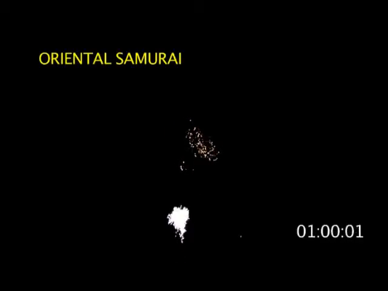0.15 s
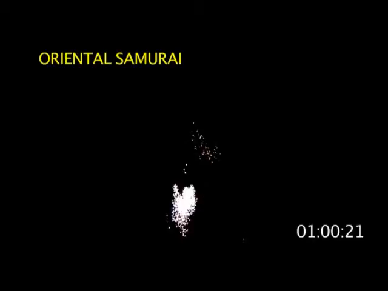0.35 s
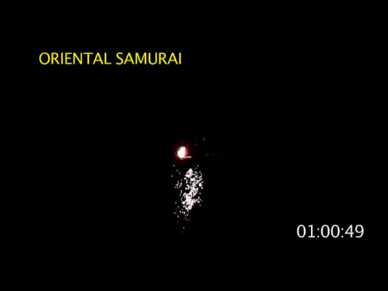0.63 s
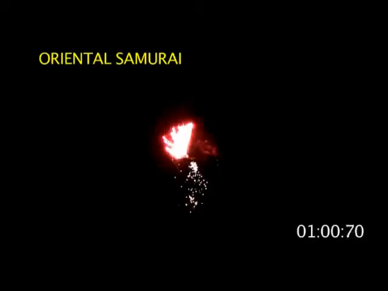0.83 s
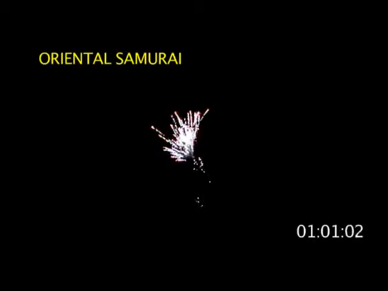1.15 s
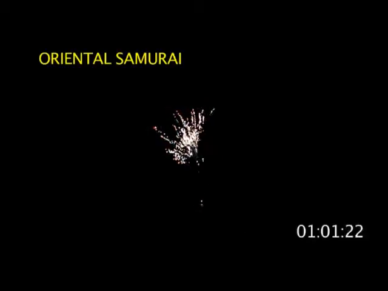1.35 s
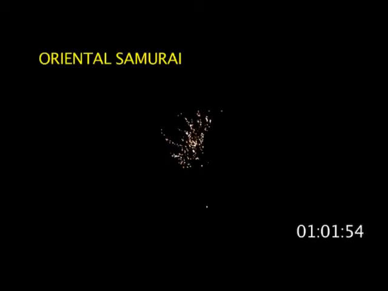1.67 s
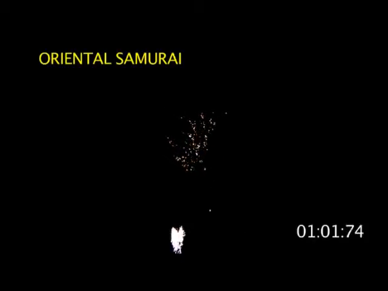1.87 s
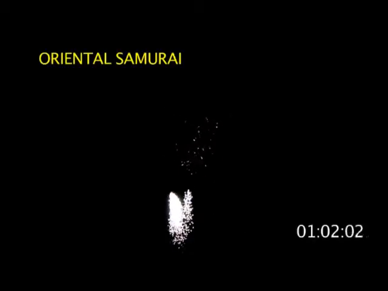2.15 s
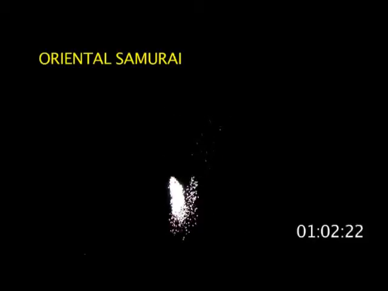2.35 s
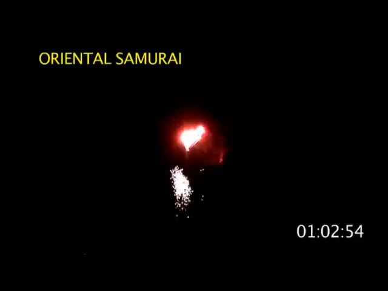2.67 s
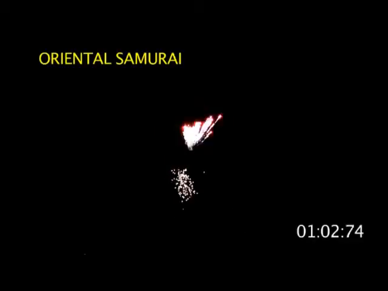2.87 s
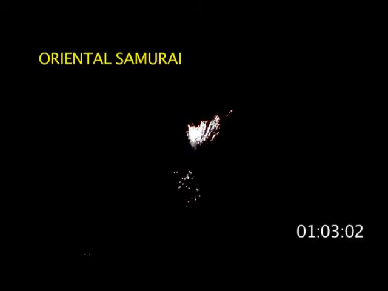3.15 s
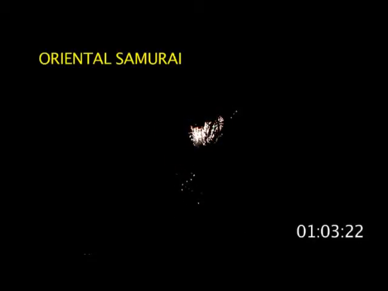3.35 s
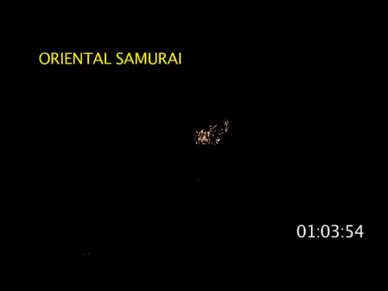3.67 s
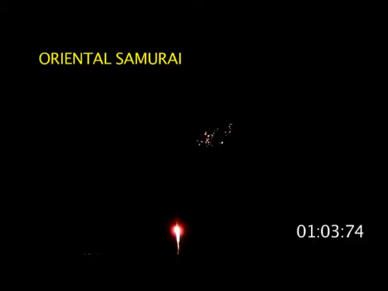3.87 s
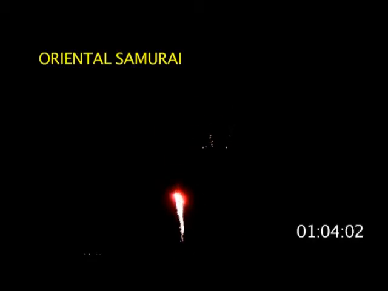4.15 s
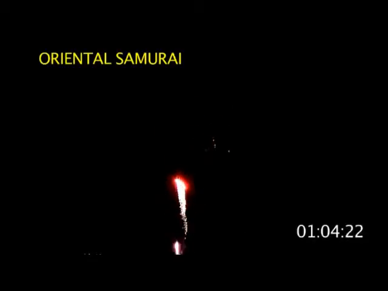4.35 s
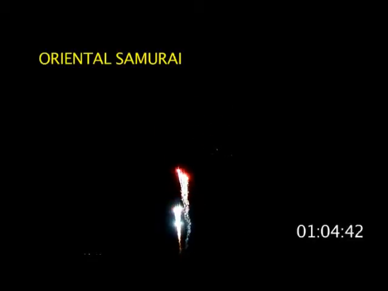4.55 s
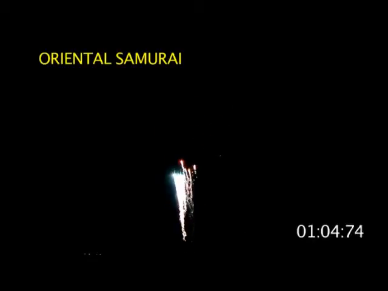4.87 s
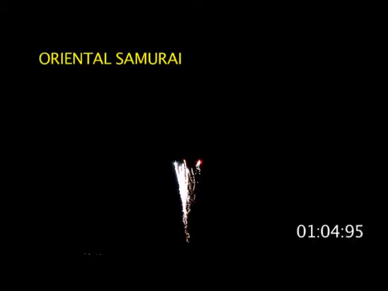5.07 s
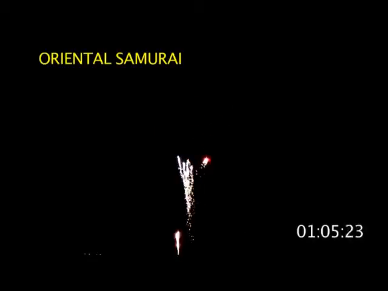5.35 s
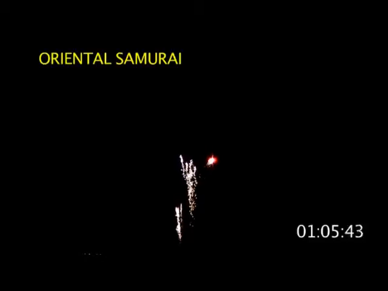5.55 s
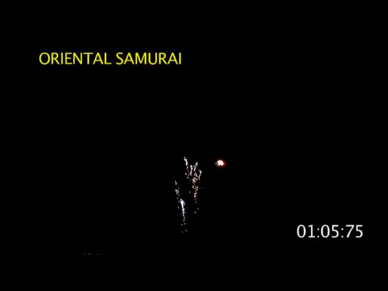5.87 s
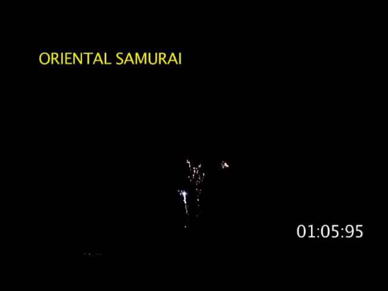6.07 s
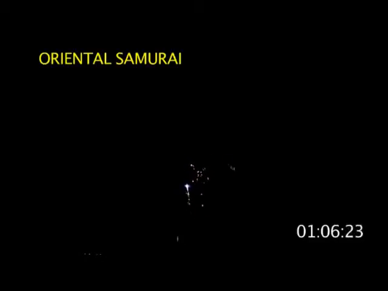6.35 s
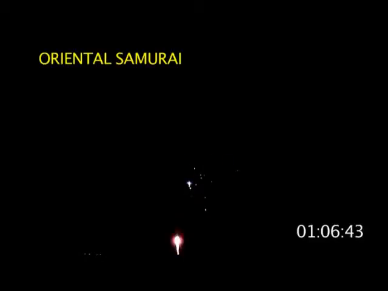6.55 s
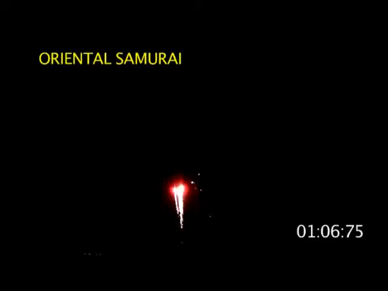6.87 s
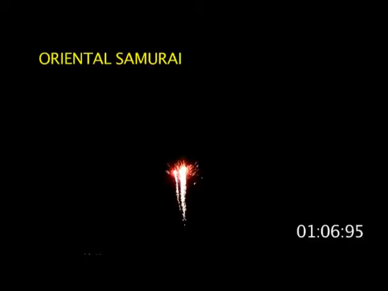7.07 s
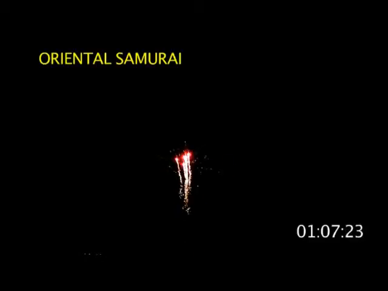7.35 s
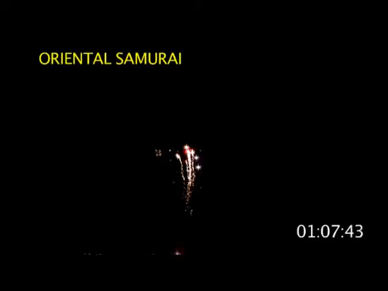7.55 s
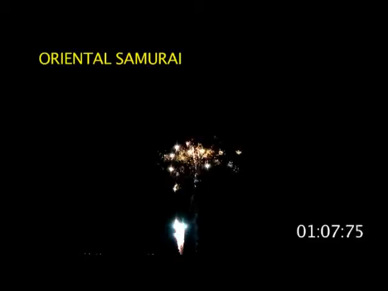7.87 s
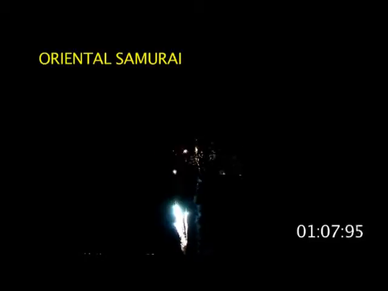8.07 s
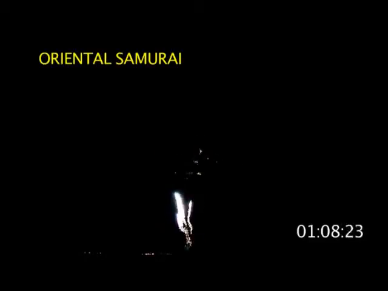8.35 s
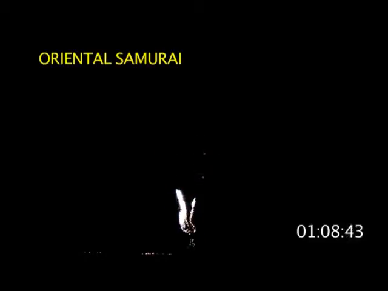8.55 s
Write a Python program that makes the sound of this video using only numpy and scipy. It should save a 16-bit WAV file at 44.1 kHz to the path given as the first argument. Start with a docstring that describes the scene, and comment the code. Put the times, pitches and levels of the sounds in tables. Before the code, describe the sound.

Outdoors over faint night air, fireworks leave their tubes with dull thumps and a light hiss of sparks. Two shells burst early with loud cracks that overload the microphone and roll back as echoes. After a quieter stretch of soft launch thuds, a third bang rings out, followed by a rapid patter of crackling pops that thins out at the end.

```python
"""Outdoors on a quiet night, a box of fireworks fires its shots some way off.
Small powder charges thump in their tubes and send up hissing, burning tails. Three shells crack
overhead and their echoes roll back from the surroundings. The last shell scatters a cloud of
crackling stars (little burning pellets). The loudest cracks overload the microphone."""
import sys
import numpy as np
from scipy import signal
from scipy.fft import rfft, irfft
from scipy.io import wavfile
from scipy.ndimage import uniform_filter1d

SR = 44100
rng = np.random.default_rng(int(sys.argv[2]) if len(sys.argv) > 2 else 0)


def generate_wav(signal):
    """Clip the signal to [-1, 1] and save it as 16-bit WAV at the path in sys.argv[1]."""
    frames = np.transpose(np.atleast_2d(signal))
    scaled = np.clip(frames, -1, 1) * 32767
    pcm = np.round(scaled).astype(np.int16)
    wavfile.write(sys.argv[1], SR, pcm)


N = 384111
TIME = np.arange(N) / SR

# The tone of the night air. Each row: frequency in Hz, level in dB.
AIR_SPECTRUM = [(12, -43), (20, -20), (60, -3.5), (81, -6), (216, -16.5), (410, -23), (738, -21.5),
                (802, -20), (976, -21), (1060, -17.5), (1610, -25.5), (1760, -28.5), (2390, -33.5),
                (13900, -51.5), (16000, -57.5)]
# How wide all-around sound is. Each row: frequency in Hz, stereo side level over the middle in dB.
STEREO_WIDTH = [(60, -14.5), (99, -17.5), (160, -14), (270, -13.5), (450, 2), (740, -0.5), (1220, -2),
                (2010, -5.5), (3330, -12.5), (5500, 5.5), (9080, 2.5), (15000, -4)]
# Small dull pops, soft thuds, fizzes and a brief ring in the first shell's echo. Each row: time in seconds,
# level in dB, pitch in Hz, # width in octaves, spread in seconds.
SMALL_PUFFS = [(0.484, -17.5, 1225, 0.073, 0.0021), (.863, -34.5, 1204, 0.15, 0.001),
               (0.8907, -33, 1200, 0.12, 0.0016), (1.153, -35.5, 1070, 0.029, 0.029),
               (2.224, -67, 9800, .3, .018), (3.911, -49.5, 115, 0.41, 0.024),
               (5.273, -65.5, 1780, 0.19, 0.0094), (5.895, -62, 10000, .4, .001),
               (6.32, -69, 9500, .3, .001), (6.469, -59, 1900, 0.42, 0.01), (7.772, -52, 2300, 0.25, 0.011)]
# The charges that lift the shots. Each row: start in seconds, thump level in dB, bass tilt in dB per
# octave, gas spit level in dB, its decay in seconds, its pitch in Hz, tail hiss level in dB,
# the time the hiss takes to swell in seconds.
LIFT_CHARGES = [(0.2236, -5.5, 0, -23, 0.004, 2920, -51.5, 0.27),
                (2.0645, -4, 0.5, -23.5, 0.0031, 3200, -55.5, .13),
                (4.026, -30, 0.5, -46, 0.0045, 3120, -68.5, 0.026),
                (4.6269, -23.5, -1, -43.5, 0.004, 2870, -66.5, 0.05),
                (5.5492, -27.5, 1, -34.5, 0.003, 2465, -65, 0.039),
                (6.5428, -16, 2, -35, 0.0044, 2560, -67.5, 0.052),
                (6.808, -22, 0.5, -32.5, 0.0025, 3360, -70.5, 0.039),
                (7.848, -30.5, -0.5, -47.5, 0.0039, 3000, -67, 0.046)]
# Shells bursting overhead. Each row: start in seconds, level in dB, ground bounce delay in seconds,
# bounce level in dB, echo level in dB, extra bite in the upper middle tones in dB.
SHELL_BURSTS = [(.9614, 10.5, .00272, -11.5, -11, -2), (2.8358, 11.5, 0.003, -7, -13.5, 1),
                (7.2984, 8.5, 0.00248, -6.5, -10.5, 3.5)]
# Stars that pop alone or stand out of the cloud. Each row: start in seconds, level in dB.
STANDOUT_STARS = [(.4518, -8), (.4797, -7.5), (7.8103, -33.5), (7.8578, -12.5), (7.9034, -18.5),
                  (7.930, -12.5), (7.962, -10.5), (8.002, -9.5), (8.027, -5), (8.039, -5.5), (8.113, -2.5),
                  (8.200, -4.5), (8.217, -2), (8.269, -11), (8.324, -14), (8.352, -25.5), (8.388, -10),
                  (8.4411, -7), (8.4449, -20), (8.462, -5.5), (8.473, -19.5), (8.5352, -14),
                  (8.5769, -14.5), (8.6248, -15.5)]
# The tones of a lift charge, escaping gas, a burning tail, a star and a shell.
# Each row: frequency in Hz, level in dB.
THUMP_SPECTRUM = [(20, -46), (35, -25.5), (55, -8.5), (85, -4), (130, 0), (180, -3.5), (205, -16.5),
                  (235, -2.5), (280, -7), (328, -3.5), (380, -27), (700, -36), (1500, -44), (5000, -71.5)]
GAS_SPECTRUM = [(200, -10), (700, -13), (1400, -10), (2200, -3.5), (3050, -2.5), (4300, -10.5), (4950, -10),
                (6300, -21.5), (7600, -32.5), (10000, -26.5), (16000, -48)]
SPARK_SPECTRUM = [(500, -16.5), (1400, -4), (2300, 1.5), (3100, 1.5), (4200, -7.5), (5000, -9), (6200, -21),
                  (7600, -28), (9800, -24.5), (13500, -23), (16000, -35.5)]
STAR_SPECTRUM = [(40, -34.5), (320, -6), (500, -11.5), (800, -9), (1200, -5), (1450, -8), (2200, -1.5),
                 (3000, 0), (4300, -12), (5000, -15.5), (7400, -35), (9800, -31.5), (14000, -44),
                 (17000, -63)]
SHELL_SPECTRUM = [(20, -40), (55, -7.5), (110, 1.5), (300, 7.5), (700, 5.5), (1150, 2), (1450, -1),
                  (2200, 2), (3000, 1), (4100, -11.5), (5000, -14.5), (7500, -31), (9800, -23),
                  (14000, -27.5), (17000, -51)]
# Groups of surfaces that echo a sound made in the sky, or on the ground.
# Each row: delay in seconds, boost over the even echo in dB, spread in seconds.
SKY_REFLECTORS = [(.03, 5.5, .025), (.135, 11, .022), (.21, 15, 0.035), (.33, 10.5, .025), (.39, 8, 0.016),
                  (.485, 6, .016), (.72, 3.5, .025)]
GROUND_REFLECTORS = [(.016, 6, .015), (.113, 5, 0.013), (.25, 4, .04)]
# Large surfaces that slap sound back. Each row: delay in seconds, strength in dB.
WALL_SLAPS = [(.07, 20), (0.116, 27.5), (0.207, 22), (.25, 4), (.355, 34.5), (0.407, 38.5)]
# The tone of the echoes. Each row: frequency in Hz, boost in dB.
ECHO_TONE = [(40, 6.5), (150, 5), (330, -5), (600, -4.5), (1100, 2), (2500, -3), (5000, 2.5), (8000, 8.5),
             (14000, 10.5)]
# What the air soaks up. Each row: frequency in Hz, loss in dB per second of travel.
AIR_LOSS = [(100, 4), (1100, 3.3), (2200, 8.9), (3500, 13), (5000, 15), (8000, 90), (14000, 100)]
# Tones the microphone's housing lifts or dips. Each row: frequency in Hz, width in Hz, boost in dB.
HOUSING_RESONANCES = [(1800, 110, 2.5), (2200, 100, 4), (2650, 570, -0.5), (2960, 160, 0), (3930, 120, 3.5),
                      (4480, 500, -4), (4850, 110, 6.5), (9140, 2900, 0.5), (12500, 870, 3)]

SKY_FADE_DB_PER_S, GROUND_FADE_DB_PER_S = 12.5, 29  # echo fade, on top of the loss in the air


def gain_of(db):
    """Turns decibels into a number to multiply by."""
    return 10 ** (np.asarray(db) / 20)


def unit_level(x):
    """Scales a signal to an average (rms) level of 1."""
    return x / np.sqrt(np.mean(x ** 2) + 1e-20)


def bell(t, centre_s, spread_s):
    """A smooth swell around one moment, with peak 1."""
    return np.exp(-.5 * ((t - centre_s) / spread_s) ** 2)


def db_at(spectrum, hz):
    """Looks up a level between a table's rows, on a log-frequency scale."""
    row_hz, row_db = np.transpose(spectrum)
    return np.interp(np.log(hz + 1), np.log(row_hz + 1), row_db)


def add(mix, start_s, sound):
    """Mixes a sound in at its start time."""
    part = mix[..., round(start_s * SR):][..., :sound.shape[-1]]
    part += sound[..., :part.shape[-1]]


def coloured(x, spectrum):
    """Filters a signal by the levels in a table."""
    hz = np.fft.rfftfreq(x.shape[-1], 1 / SR)
    return irfft(rfft(x) * gain_of(db_at(spectrum, hz)), x.shape[-1])


def resonate(x, centre_hz, width_hz, boost_db):
    """One resonance lifts or dips a band of tones."""
    band = signal.lfilter(*signal.iirpeak(centre_hz, centre_hz / width_hz, fs=SR), x)
    return x + (gain_of(boost_db) - 1) * band


def all_around(pair):
    """Two unrelated signals become the middle and side of a wide stereo sound."""
    side = coloured(pair[1], STEREO_WIDTH)
    return np.array([pair[0] + side, pair[0] - side])


def pulse(spectrum, tilt_db=0, size=4096):
    """The most sudden push of air that has the given tone, with peak 1."""
    hz = np.fft.rfftfreq(size, 1 / SR)
    bass_db = tilt_db * np.log2(np.clip(hz, 30, 400) / 400)
    log_gain = np.log(gain_of(np.maximum(db_at(spectrum, hz) + bass_db, -90)))
    mirrored = np.r_[log_gain, log_gain[-2:0:-1]]
    wave = np.fft.ifft(np.exp(signal.hilbert(mirrored).conj())).real  # packs the energy at the start
    wave = wave[:size // 2] * signal.windows.tukey(size, .5)[size // 2:]
    return wave / abs(wave).max()


def with_bounce(wave, bounce_s, bounce_db, scatter_db, decay_s, size=1024):
    """A sound arrives directly, bounces off the ground and scatters off things close by."""
    age = np.maximum(TIME[:size] - bounce_s / 2, 0) / decay_s
    paths = all_around(rng.standard_normal((2, size))) * age * np.exp(-age)
    paths *= gain_of(scatter_db) / np.linalg.norm(paths[0])
    paths[:, 0] += 1  # the direct path
    paths[:, min(round(bounce_s * SR), size - 1)] += gain_of(bounce_db)
    return signal.fftconvolve(paths, wave[None], axes=1)


def wall_slaps(size, stray_per_s=40, stray_db=26, smear_samples=400):
    """Large surfaces send back dull slaps, some at set delays and some at random."""
    slaps = gain_of(stray_db) * rng.standard_normal(size) * (rng.random(size) < stray_per_s / SR)
    smear = signal.windows.hann(smear_samples)  # a rough surface draws its slap out
    for delay_s, wall_db in WALL_SLAPS:
        slap = smear * rng.standard_normal(smear_samples) / np.linalg.norm(smear)
        add(slaps, delay_s - smear_samples / (2 * SR), gain_of(wall_db) * slap)
    return signal.lfilter(*signal.butter(2, 1300, fs=SR), slaps)


def echoes(x, reflectors, fade_db_per_s, lumpy_db, patchy_db=2.5, size=98304):
    """Countless reflections come back in clumps; the air takes their treble as they travel."""
    slaps = wall_slaps(size)
    reflections = all_around(rng.standard_normal((2, size))) + slaps
    hz, t, slices = signal.stft(reflections, SR, nperseg=256)
    clumps = unit_level(uniform_filter1d(rng.standard_normal(len(t)), size=4))
    swells = 1 + sum((gain_of(boost_db) - 1) * bell(t, delay_s, spread_s)
                     for delay_s, boost_db, spread_s in reflectors)
    level_db = 20 * np.log10(abs(swells)) - fade_db_per_s * t + lumpy_db * clumps
    level_db -= 10 * np.log10(np.sum(gain_of(level_db) ** 2) * size / len(t))  # total energy of 1
    level_db = level_db + db_at(ECHO_TONE, hz)[:, None] - db_at(AIR_LOSS, hz)[:, None] * t
    patches = uniform_filter1d(rng.standard_normal(slices.shape[1:]), size=3, axis=0)
    patches = unit_level(uniform_filter1d(patches, size=12, axis=1))
    level_db += patchy_db * (patches - .5)  # each group of surfaces has its own tone
    tail = signal.istft(slices * gain_of(level_db), SR, nperseg=256)[1]
    return signal.fftconvolve(x[None], tail, axes=1)[:, :N]


def night_air(level_db=-60.5):
    """A quiet outdoor rumble and hiss from all around."""
    noise = coloured(rng.standard_normal((2, N)), AIR_SPECTRUM)
    return gain_of(level_db) * unit_level(all_around(noise))


def dying_echo(ago_s=0.7, echo_db=-1):
    """The echo of a shell that burst just before the start is still dying away."""
    out = np.zeros((2, N))
    echo = echoes(pulse(SHELL_SPECTRUM), SKY_REFLECTORS, SKY_FADE_DB_PER_S, lumpy_db=2.5)
    add(out, 0, gain_of(echo_db) * echo[:, round(ago_s * SR):])
    return out


def puffs(size=16384):
    """Small pops, thuds, fizzes and an echo's ring, each a brief swell of noise around one pitch."""
    out, hz = np.zeros((2, N)), np.fft.rfftfreq(size, 1 / SR)
    t = (np.arange(size) - size / 2) / SR
    for time_s, level_db, pitch_hz, octaves, spread_s in SMALL_PUFFS:
        band = 1 / (1 + (np.log2((hz + 1) / pitch_hz) / (2 * octaves)) ** 2) ** 2
        noise = irfft(rfft(rng.standard_normal((2, size))) * band)
        puff = unit_level(all_around(noise)) * bell(t, 0, spread_s)
        add(out, time_s + t[0], gain_of(level_db) * puff)
    return out


def burning_tails(spark_db=3.0, flutter_db=1.9, hold_s=.28, fade_db_per_s=27):
    """Each shot trails a spray of tiny sparks whose hiss swells, flutters and fades as it climbs."""
    sparks = rng.standard_normal((2, N)) * gain_of(spark_db * np.minimum(rng.exponential(1, N), 7))
    hiss = unit_level(all_around(coloured(sparks, SPARK_SPECTRUM)))
    flutter = unit_level(uniform_filter1d(rng.standard_normal(N), size=1200))
    power = np.zeros(N)
    for start_s, *_, hiss_db, swell_s in LIFT_CHARGES:
        swell = np.clip((TIME - start_s) / swell_s, 0, 1)
        fade_db = fade_db_per_s * np.maximum(TIME - start_s - hold_s, 0)
        power += (swell * gain_of(hiss_db - fade_db)) ** 2
    return hiss * np.sqrt(power) * gain_of(flutter_db * flutter)


def gas_jet(pitch_hz, size):
    """Escaping gas hisses and resonates at the mouth of its tube."""
    hiss = coloured(rng.standard_normal(size), GAS_SPECTRUM)
    return unit_level(resonate(hiss, pitch_hz, width_hz=470, boost_db=9))


def whoosh(spit, delay_s=0.2255, spread_s=0.013, gain_db=-9.5, top_hz=2640, size=16384):
    """A spit of gas comes back from a far, rough surface, smeared and dulled."""
    paths = all_around(rng.standard_normal((2, size))) * bell(TIME[:size], delay_s, spread_s)
    paths /= np.linalg.norm(paths.mean(0))
    dulled = signal.lfilter(*signal.butter(2, top_hz, fs=SR), paths)
    return gain_of(gain_db) * signal.fftconvolve(dulled, spit[None], axes=1)


def launches(echo_db=-20, ring_hz=328, ring_db=-18.5, ring_s=0.006, leak_s=.0035, leak_db=-12, size=4096):
    """Each charge leaks a little gas, then thumps, rings its hollow tube and spits briefly."""
    out, t = np.zeros((2, N)), TIME[:size]
    ring = gain_of(ring_db) * np.sin(2 * np.pi * ring_hz * t) * (t / ring_s) * np.exp(1 - t / ring_s)
    for start_s, thump_db, tilt_db, spit_db, decay_s, spit_hz, _, _ in LIFT_CHARGES:
        gas_flow = np.where(t < leak_s, gain_of(leak_db), np.exp((leak_s - t) / (2 * decay_s)))
        spit = gain_of(spit_db) * gas_jet(spit_hz, size) * gas_flow
        shot = spit.copy()
        add(shot, leak_s, gain_of(thump_db) * pulse(THUMP_SPECTRUM, tilt_db))
        add(shot, leak_s, gain_of(thump_db) * ring)
        add(out, start_s - leak_s, shot)
        add(out, start_s - leak_s, whoosh(spit))
        echo = echoes(shot, GROUND_REFLECTORS, GROUND_FADE_DB_PER_S, lumpy_db=2.5)
        add(out, start_s - leak_s, gain_of(echo_db) * echo)
    return out


def star_cloud(start_s=7.932, end_s=8.372, swell_s=0.092, thin_s=.14, variety_db=2.0, max_stars=300):
    """Times and levels for a cloud of small pops that swells, holds, thins out and stops."""
    pops_per_s = np.interp(TIME, [end_s - thin_s, end_s], [300, 150], right=0)
    popped_so_far = np.cumsum(pops_per_s * (TIME > start_s)) / SR
    stray, strength = rng.standard_normal((max_stars, 2)).T
    turn = abs(np.arange(max_stars) + 1.5 * stray)  # each star burns through a little early or late
    times = np.interp(turn, popped_so_far, TIME)
    levels_db = np.interp(times, [start_s, start_s + swell_s], [-23, -11])
    levels_db += variety_db * np.minimum(strength, 1.3)
    return np.c_[times, levels_db][turn < popped_so_far[-1]]


def crackling_stars(echo_db=-18.5):
    """Stars pop one by one, each in its own place and so with its own ground bounce."""
    out, pop = np.zeros((2, N)), pulse(STAR_SPECTRUM)
    for start_s, level_db in [*STANDOUT_STARS, *star_cloud()]:
        bounce_s = rng.uniform(.0014, .0034)
        wave = gain_of(level_db) * pop
        add(out, start_s, with_bounce(wave, bounce_s, bounce_db=-9.5, scatter_db=-4.5, decay_s=0.0031))
    return out + gain_of(echo_db) * echoes(out.mean(0), SKY_REFLECTORS, SKY_FADE_DB_PER_S, lumpy_db=3.5)


def shell_bursts():
    """Each shell cracks overhead; its echo swells a moment later and rolls away."""
    out, crack = np.zeros((2, N)), pulse(SHELL_SPECTRUM)
    for start_s, level_db, bounce_s, bounce_db, echo_db, bite_db in SHELL_BURSTS:
        wave = gain_of(level_db) * resonate(crack, centre_hz=3300, width_hz=820, boost_db=bite_db)
        add(out, start_s, with_bounce(wave, bounce_s, bounce_db, scatter_db=-8.5, decay_s=0.002))
        echo = echoes(wave, SKY_REFLECTORS, SKY_FADE_DB_PER_S, lumpy_db=1.77)
        add(out, start_s, gain_of(echo_db) * echo)
    return out


def scene():
    """Launches, bursts and crackle over the quiet of the night."""
    bangs = launches() + shell_bursts() + dying_echo()
    return bangs + burning_tails() + puffs() + night_air() + crackling_stars()


def record(dry):
    """The microphone's housing colours the sound, loud cracks overload, and the top treble is cut."""
    for centre_hz, width_hz, boost_db in HOUSING_RESONANCES:
        dry = resonate(dry, centre_hz, width_hz, boost_db)
    clipped = np.clip(dry, -1, 1)
    treble_cut = signal.firwin(255, cutoff=15650, window=("kaiser", 8), fs=SR)
    return signal.oaconvolve(clipped, treble_cut[None], "same")


dry = scene()
out = record(dry)
generate_wav(out)
```